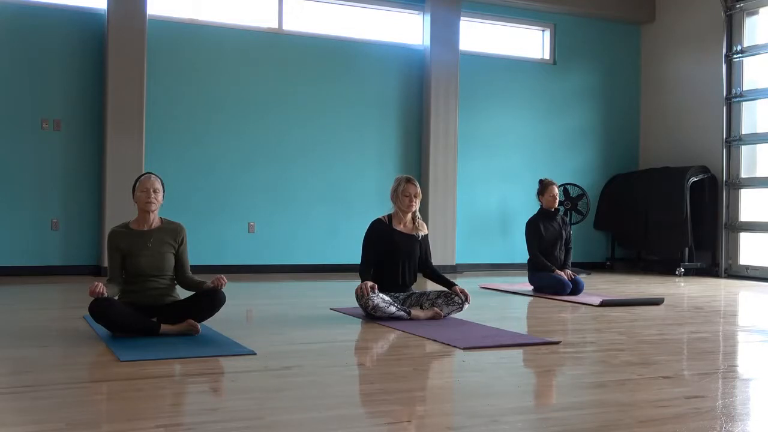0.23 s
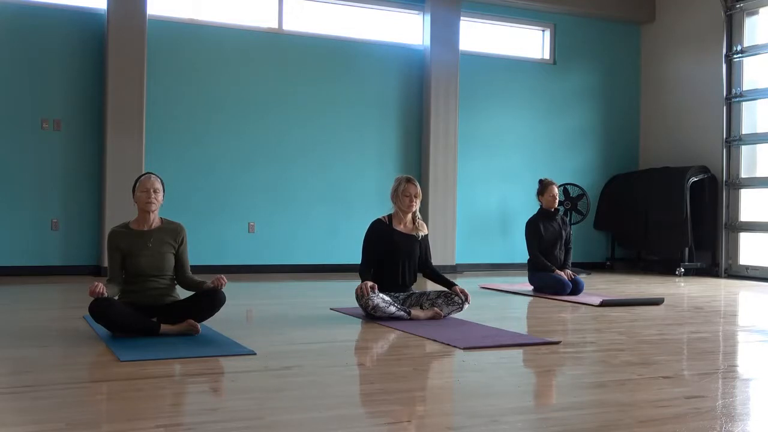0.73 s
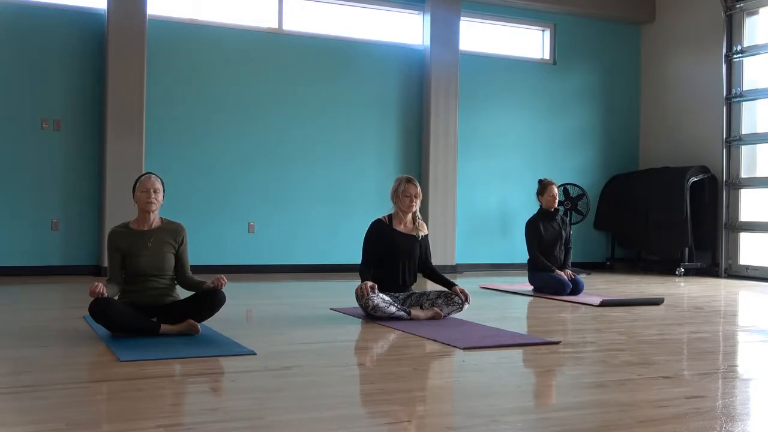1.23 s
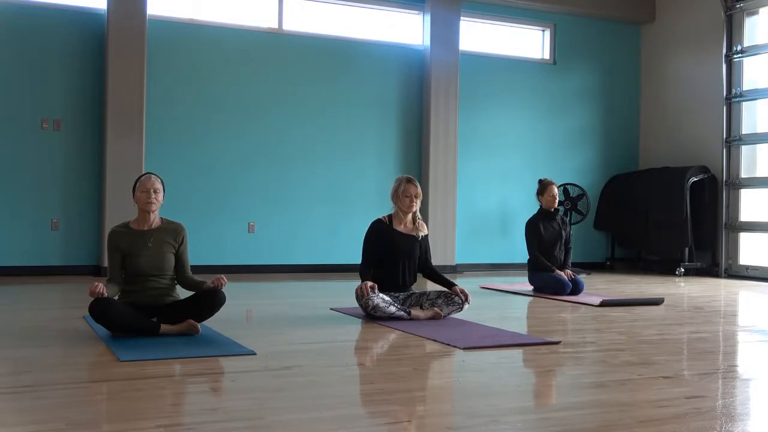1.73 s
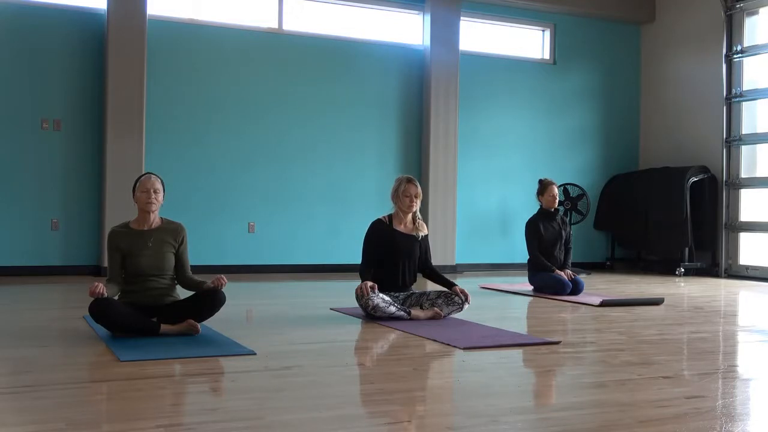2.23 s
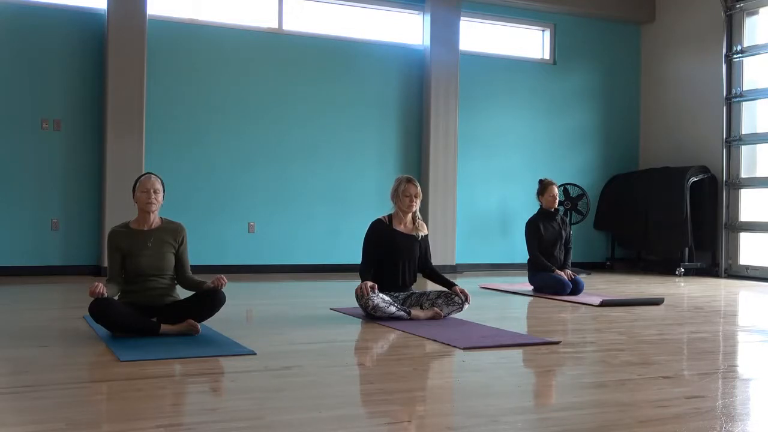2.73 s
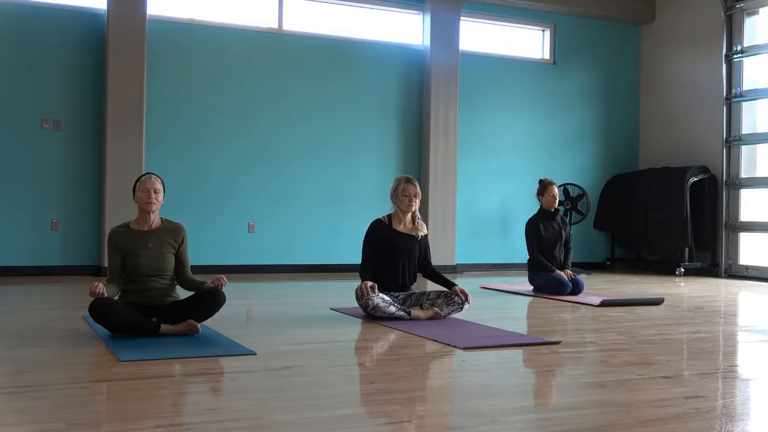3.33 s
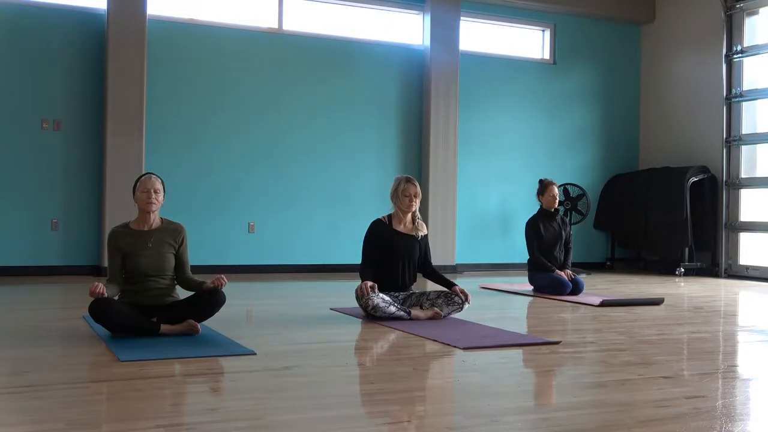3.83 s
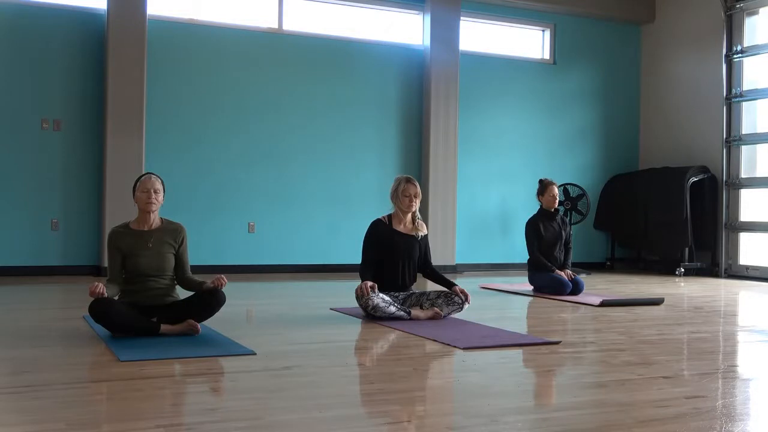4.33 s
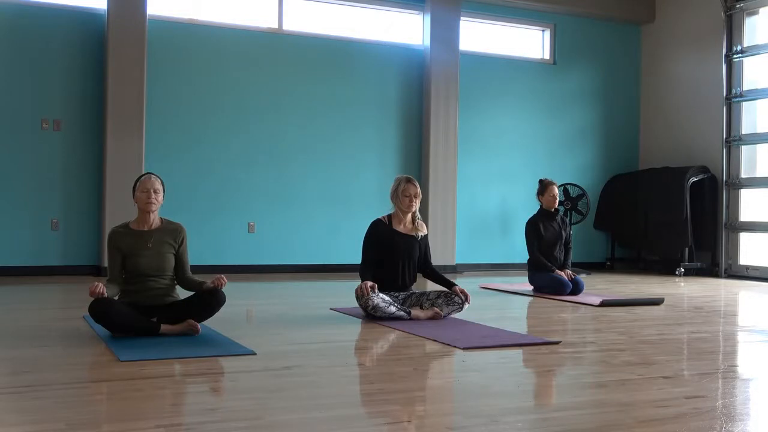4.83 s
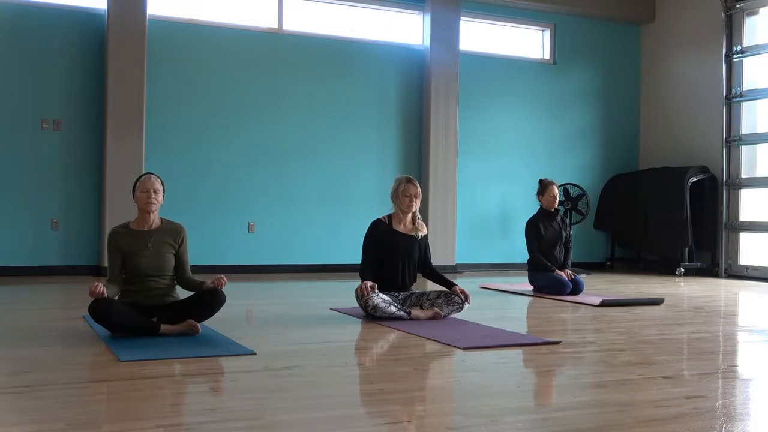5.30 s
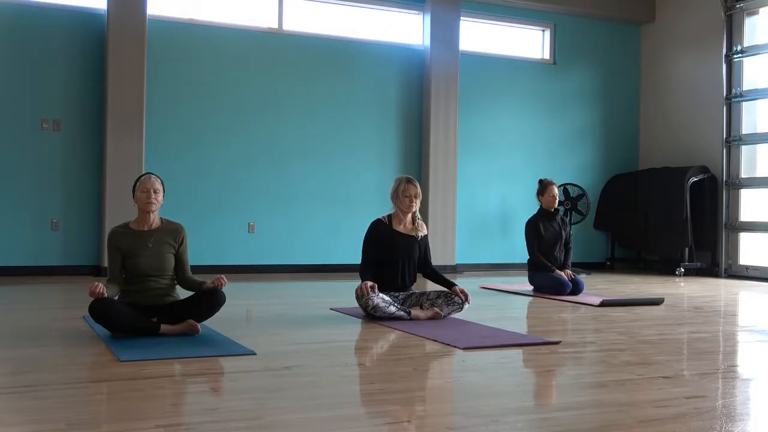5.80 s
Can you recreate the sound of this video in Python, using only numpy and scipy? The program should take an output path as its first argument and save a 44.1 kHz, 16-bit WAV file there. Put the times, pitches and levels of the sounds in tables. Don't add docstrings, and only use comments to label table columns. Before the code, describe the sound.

A still exercise hall heard through a noisy small camera: constant broad hiss, fluttering bass rumble from traffic and ventilation, and a faint low hum.

```python
import sys
import numpy as np
from scipy import signal
from scipy.fft import rfft, irfft
from scipy.io import wavfile
from scipy.ndimage import uniform_filter1d

SR = 44100
rng = np.random.default_rng(int(sys.argv[2]) if len(sys.argv) > 2 else 0)


def unload_wav(signal):
    wavfile.write(
        sys.argv[1],
        SR,
        np.round(np.clip(np.atleast_2d(signal).T, -1, 1) * 32767).astype(np.int16),
    )


def gain_from_db(level_db):
    decades = np.asarray(level_db, float) / 20
    return 10 ** decades


N = 267246

# f/Hz, level/dB per Hz
TRAFFIC_TONE = [(8, -8), (16, 2.5), (24, -3), (30, 2.5), (36, -2.5), (46, 5), (62, -7), (75, -46)]
# f/Hz, width/Hz, lift/dB
HALL_RESONANCE = [(32.7, 7.6, 9)]
# t/s, lift/dB
LOW_RUMBLE_SWELLS = [(.15, -11), (.27, 2), (.39, 3), (.45, -11), (.55, 4), (1.13, -0.5), (1.33, 9.5),
                     (1.44, -8), (1.57, 2.5), (2.21, -5), (2.3, 5), (3.11, -2), (3.41, 3.5), (3.55, 5),
                     (3.93, -6), (4.19, -1), (4.83, -14), (5.18, 3), (5.47, -12), (5.55, 7.5), (5.91, 4)]
# f/Hz, level/dB per Hz
DUCT_TONE = [(50, -20), (62, 1), (95, -3.5), (125, -5.5), (150, -10.5), (170, -13), (210, -20)]
# f/Hz, width/Hz, lift/dB
DUCT_RESONANCES = [(84, 10, 4), (105.4, 5.1, 5), (123, 11, 5), (156, 2.7, 5)]
# t/s, lift/dB
DUCT_BAND_SWELLS = [(.18, 3.5), (.5, 4.5), (.98, -3), (1.13, 3), (1.36, -6), (1.48, 6.5), (1.72, -2.5),
                    (2.11, -5), (2.42, 3.5), (3.0, -2.5), (3.11, 2), (3.41, 2.5), (3.63, -7), (3.73, 4),
                    (4.02, 7.5), (4.19, -6.5), (4.56, 1), (4.98, -9), (5.05, 4), (5.18, -2)]
# f/Hz, level/dB per Hz
HISS_TONE = [(15, 9.5), (50, 11.5), (120, 9), (300, 5.5), (700, 1.5), (1500, -1), (3000, -3.5),
             (6000, -5.5), (10000, -6.5), (16500, -8)]
# f/Hz, level/dB per Hz
ROAR_TONE = [(130, -11), (160, -2), (200, 0), (228, -4.5), (270, -2.5), (330, -11.5), (400, -22)]
# t/s, lift/dB
ROAR_LIFTS = [(.7, -5.5), (.87, 5), (1.0, -4.5), (1.7, -1), (2.07, 4), (2.45, 6.5), (2.75, 6), (3.21, 6),
              (3.86, -1.5), (4.35, 4), (5.05, -8)]
# f/Hz, level/dB per Hz
RUSH_TONE = [(200, -8), (270, -5), (330, -0.5), (450, 0), (600, -5), (1000, -8.5), (2000, -18), (4000, -34)]
# multiple of the mains, level/dB, waver/dB
HUM_PARTIALS = [(2, -33, 1.2), (4, -34, 1.5)]

TRAFFIC_DB, DUCT_DB = -18, -19.5
HISS_DB, ROAR_DB, RUSH_DB = -23.5, -32, -36.5
SURGE_S, GUST_S = 0.042, 0.15
SHARED_HISS = 0.14
MAINS_HZ = 60
PORT_GAP_S = 0.00011
LEFT_LAG_S = 0.00004
BALANCE_DB = -0.15


def level(x, db):
    return x * gain_from_db(db) / np.sqrt(np.mean(x ** 2))


def coloured(tone, resonances=(), channels=1):
    hz = np.fft.rfftfreq(N, 1 / SR) + 1e-3
    table = np.array(tone, float)
    db = np.interp(np.log(hz), np.log(table[:, 0]), table[:, 1], left=-90, right=-90)
    for mode_hz, width_hz, lift_db in resonances:
        db = db + lift_db / (1 + (2 * (hz - mode_hz) / width_hz) ** 2)
    white = rng.standard_normal((channels, N))
    return level(irfft(rfft(white) * gain_from_db(db), N), 0)


def walk(rate):
    hold = int(SR / rate)
    steps = np.repeat(rng.standard_normal(N // hold + 1), hold)[:N]
    return 1.22 * uniform_filter1d(uniform_filter1d(steps, hold), hold)


def surges(events, half_s):
    t = np.arange(0, N, 64) / SR
    db = sum(lift_db * np.exp(-((t - s) / half_s) ** 2) for s, lift_db in events)
    return np.interp(np.arange(N) / SR, t, db)


def swelling(noise, db, hold_s):
    hold = int(hold_s * SR)
    power = uniform_filter1d(uniform_filter1d(noise ** 2, hold), hold)
    wander = np.sqrt(power + 0.051)
    return noise / wander * gain_from_db(db)


def at_ports(pair):
    alike = np.sinc(2 * np.fft.rfftfreq(N, 1 / SR) * PORT_GAP_S)
    mid = irfft(rfft(pair[0]) * np.sqrt((1 + alike) / 2), N)
    side = irfft(rfft(pair[1]) * np.sqrt(np.clip(1 - alike, 0, 2) / 2), N)
    return np.array([mid + side, mid - side])


def rumble():
    traffic = coloured(TRAFFIC_TONE, HALL_RESONANCE, channels=2)
    traffic = swelling(traffic, TRAFFIC_DB + surges(LOW_RUMBLE_SWELLS, SURGE_S), 0.04)
    ducts = coloured(DUCT_TONE, DUCT_RESONANCES, channels=2)
    ducts = swelling(ducts, DUCT_DB + surges(DUCT_BAND_SWELLS, SURGE_S), 0.083)
    return at_ports(traffic + ducts)


def hiss():
    left, right, supply = coloured(HISS_TONE, channels=3)
    own = np.sqrt(1 - SHARED_HISS) * np.array([left, right])
    pair = own + np.sqrt(SHARED_HISS) * supply
    return pair * gain_from_db(HISS_DB + 0.1 * walk(9) + 0.4 * walk(18))


def air():
    roar = swelling(coloured(ROAR_TONE, channels=2), ROAR_DB + surges(ROAR_LIFTS, GUST_S), 0.23)
    flutter_db = 0.5 * walk(2.5) + 0.8 * walk(8)
    rush = coloured(RUSH_TONE, channels=2) * gain_from_db(RUSH_DB + flutter_db)
    return at_ports(roar + rush)


def hum():
    t = np.arange(N) / SR
    total = np.zeros(N)
    for multiple, db, waver_db in HUM_PARTIALS:
        swell = np.sqrt(2) * gain_from_db(db + waver_db * walk(6))
        cycles = round(multiple) * MAINS_HZ * t + rng.random()
        total += swell * np.sin(2 * np.pi * cycles)
    return total


def scene():
    return rumble() + air() + hum()


def left_late(pair):
    lag = np.exp(-2j * np.pi * np.fft.rfftfreq(N, 1 / SR) * LEFT_LAG_S)
    return np.array([irfft(rfft(pair[0]) * lag, N), pair[1]])


def low_pass(x):
    return signal.sosfilt(signal.butter(12, 15750, fs=SR, output="sos"), x)


def record(dry):
    x = left_late(dry + hiss())
    loud = uniform_filter1d(np.mean(x ** 2, axis=0), int(0.033 * SR))
    x = x * (np.mean(loud) / loud) ** 0.03
    x = x * gain_from_db(np.array([[BALANCE_DB], [-BALANCE_DB]]) / 2)
    return low_pass(x)


dry = scene()
out = record(dry)
unload_wav(out)
```